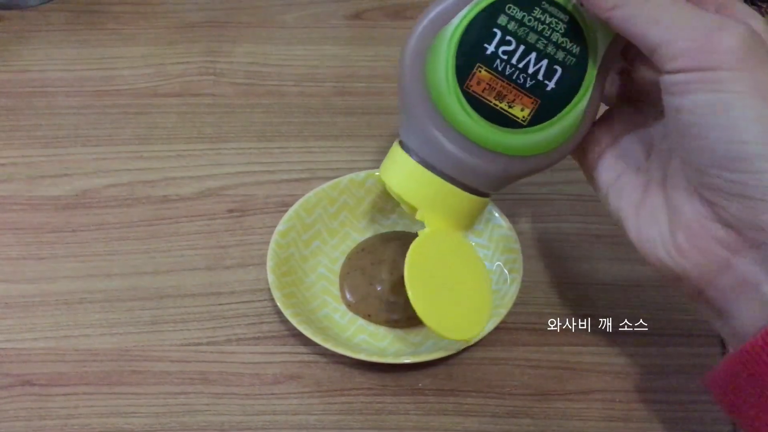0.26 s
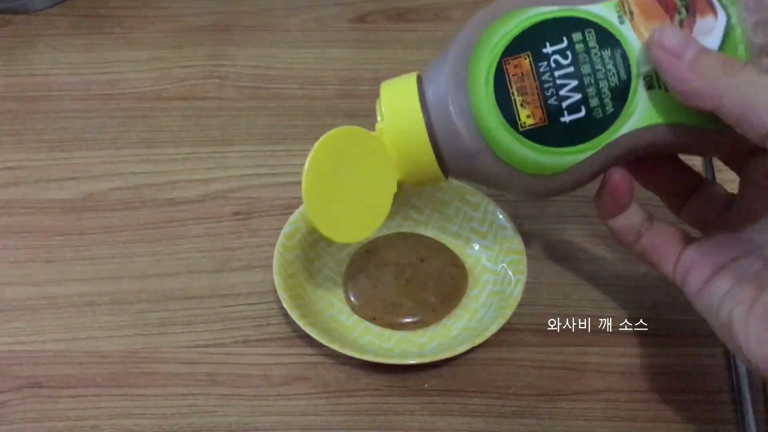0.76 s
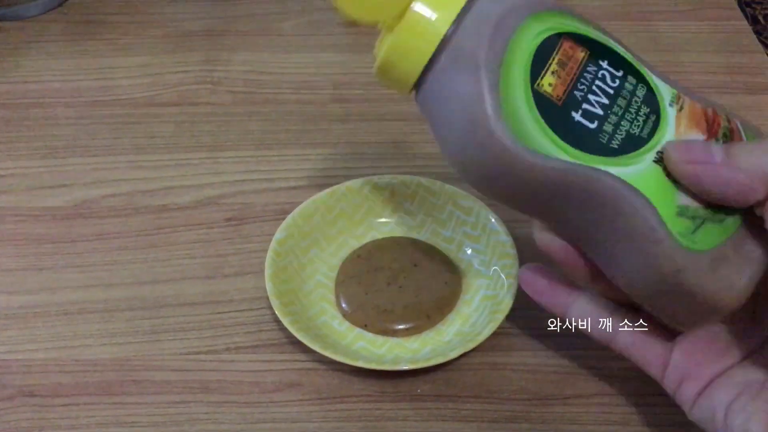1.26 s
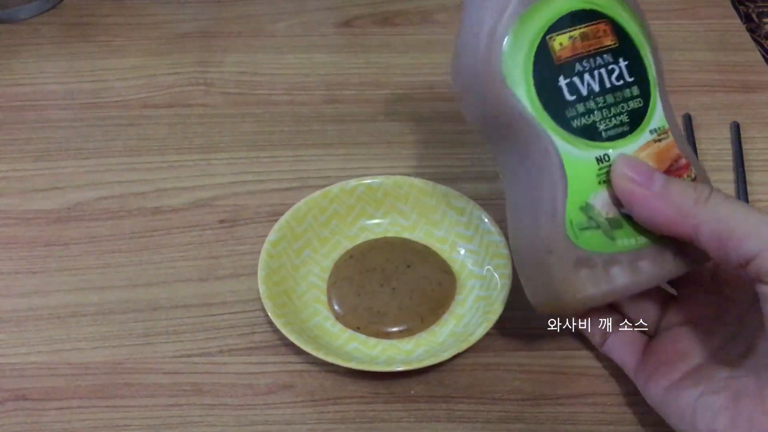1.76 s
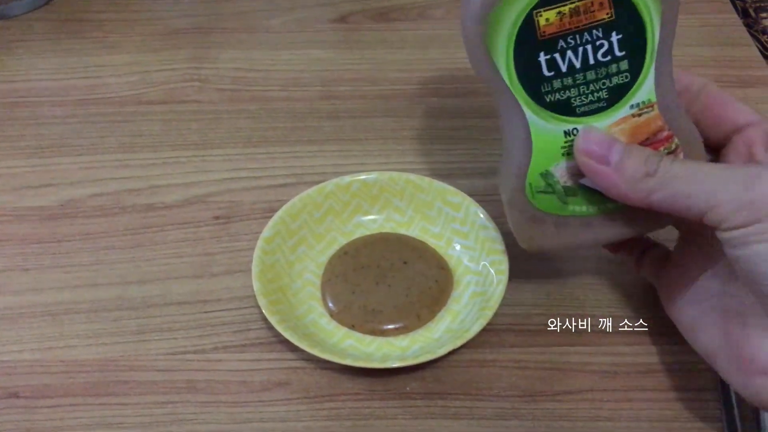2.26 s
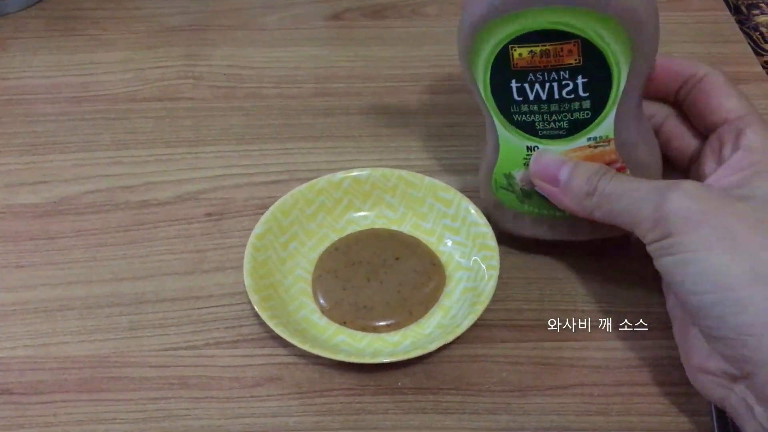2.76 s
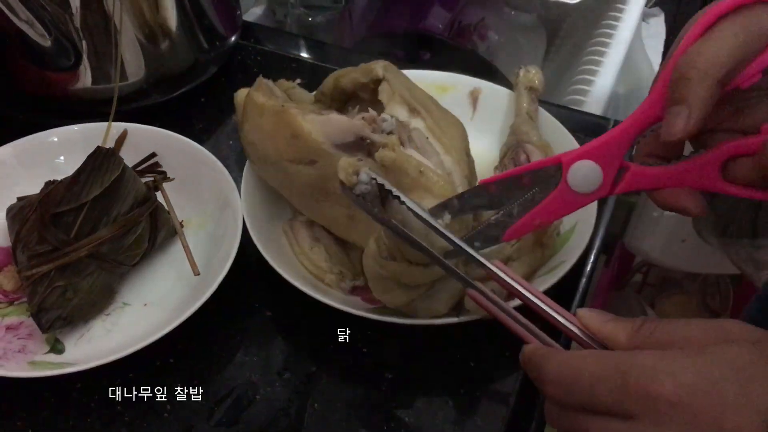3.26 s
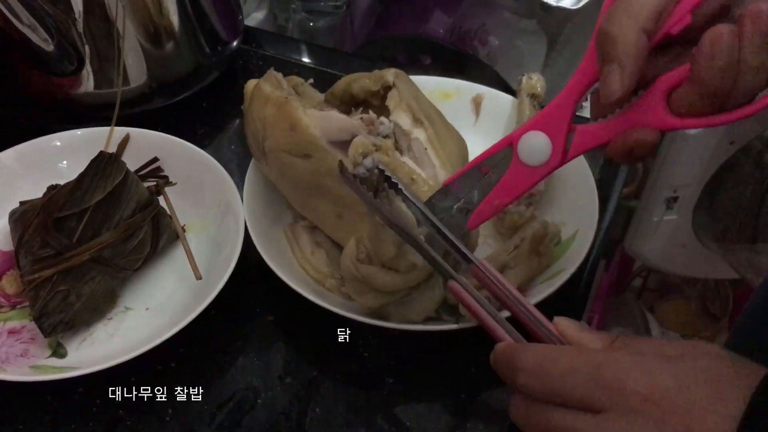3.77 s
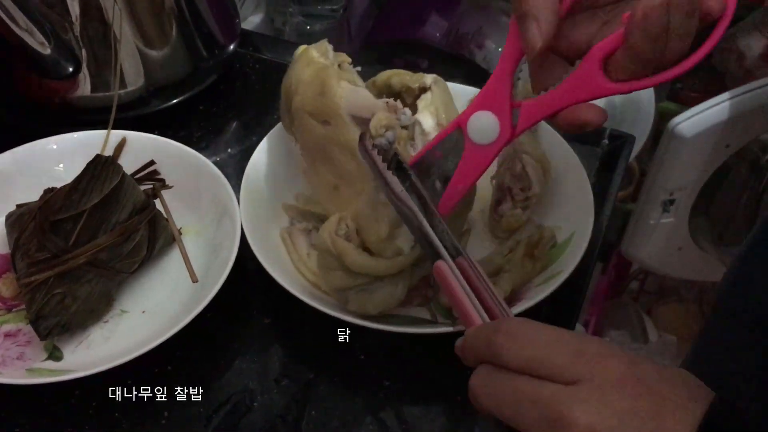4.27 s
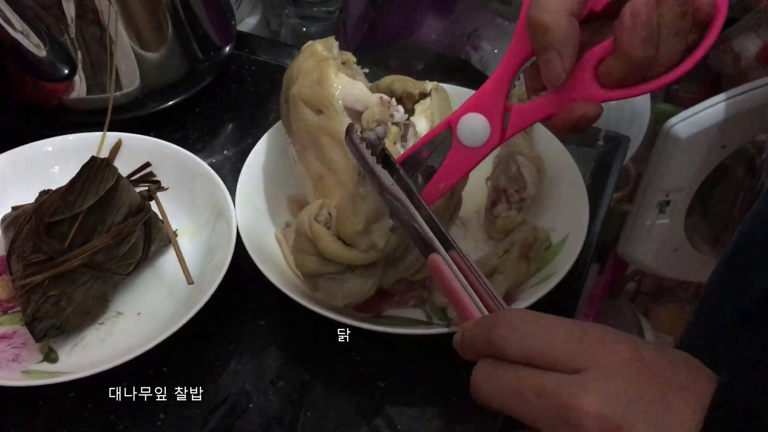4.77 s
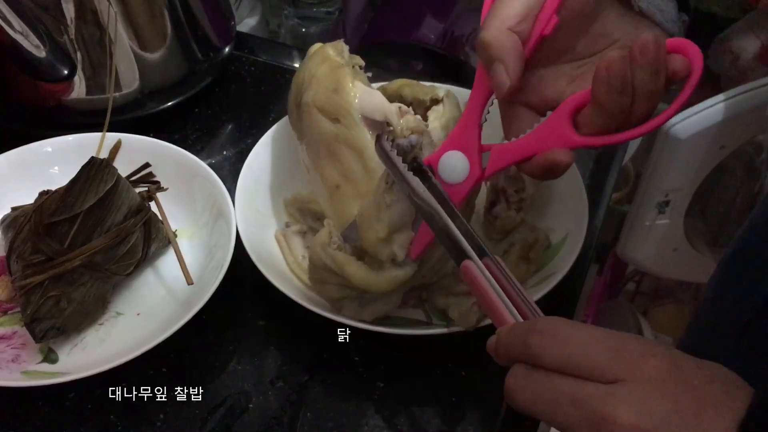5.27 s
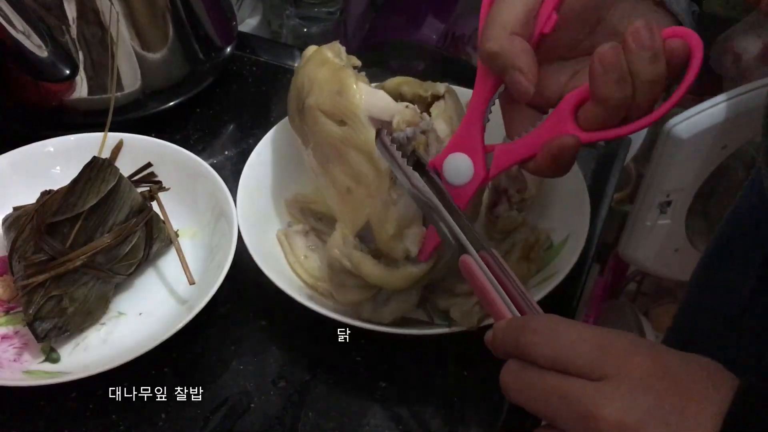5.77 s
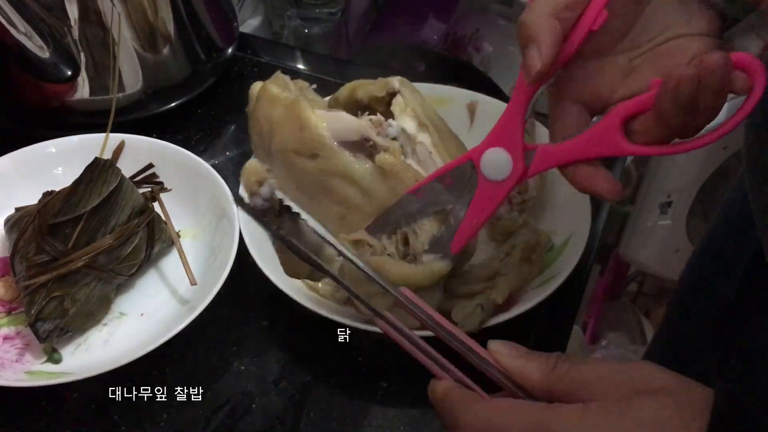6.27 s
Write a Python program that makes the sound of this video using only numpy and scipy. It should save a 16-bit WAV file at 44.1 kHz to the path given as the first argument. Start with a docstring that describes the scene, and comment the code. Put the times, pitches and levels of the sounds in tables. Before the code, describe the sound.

In a hushed room, fingers rub faintly on a plastic sauce bottle whose wall ticks and creaks. It is set down with a soft, quick knock, lightly ringing a dish. Abruptly, a low wavering kitchen drone begins. Close by, scissors tick through wet cooked chicken, steel tongs scrape lightly, one bright snip lands, then another, followed at once by a loud bone crack and small trailing clicks.

```python
"""First, fingers slide and tick on a plastic sauce bottle at a quiet table; set down, it knocks and rings beside a dish.
Then, over a kitchen's low drone, scissors work into a boiled chicken held with steel tongs:
wet ticks, two sharp snips, and a bone that gives way with a crack.
Rubs, hiss and air are filtered noise; cuts and cracks are short coloured bursts; struck things ring as dying sines."""
import sys
import numpy as np
from scipy import signal
from scipy.fft import rfft, irfft
from scipy.io import wavfile
from scipy.ndimage import uniform_filter1d

SR = 44100
rng = np.random.default_rng(int(sys.argv[2]) if len(sys.argv) > 2 else 0)


def log_audio(samples):
    """Write samples as a 16-bit WAV file to the path given in sys.argv[1]."""
    # one column per channel
    frames = np.atleast_2d(samples).T
    # limit to full scale, then quantise
    limited = np.clip(frames, -1, 1)
    pcm = np.round(limited * 32767).astype(np.int16)
    wavfile.write(sys.argv[1], SR, pcm)


N = 287825
FREQS = np.fft.rfftfreq(N, 1 / SR)
TIME = np.arange(N) / SR


def gain_of(db):
    """Turns decibels into a factor."""
    return 10 ** (np.asarray(db) / 20)


def evened(x):
    """Scales a sound to an average strength (rms) of 1."""
    return x / np.sqrt(np.mean(x ** 2) + 1e-20)


def read(points, hz):
    """Joins table points with straight lines on a log-frequency axis."""
    point_hz, value = np.transpose(points)
    return np.interp(np.log(hz + 1), np.log(point_hz + 1), value)


def add(mix, start_s, sound):
    """Mixes a sound in at a given time, cutting off what runs past the end."""
    part = mix[max(round(start_s * SR), 0):][:len(sound)]
    part += sound[:len(part)]


def noise(gain):
    """Noise of rms 1, shaped by a gain at each frequency."""
    spectrum = rfft(rng.standard_normal(N)) * gain
    return evened(irfft(spectrum, N))


def resonant_noise(hz, width_hz):
    """Noise of rms 1 in one narrow resonance."""
    return noise(1 / (1 + (2 * (FREQS - hz) / width_hz) ** 2))


def hump(hz, centre_hz, octaves):
    """A broad resonance in dB, with skirts that fall slowly."""
    distance = np.log2((hz + 1) / centre_hz) / octaves
    return -14 * np.log10(1 + distance ** 4 / 2) - 10 * np.log10(1 + distance ** 2)


def impulse(colour, size=1024):
    """A click that starts at once, with spectrum colour(Hz) in dB; rms 1 over a millisecond."""
    hz = abs(np.fft.fftfreq(size, 1 / SR))
    log_gain = np.log(gain_of(np.maximum(colour(hz), -70)))
    # this choice of phase (minimum phase) puts the energy as early as possible
    click = np.fft.ifft(np.exp(np.conj(signal.hilbert(log_gain)))).real
    return click / np.linalg.norm(click) * np.sqrt(SR / 1000)


def spatter(decay_s, direct, size=1024):
    """One push followed by a dying rush of tiny slips; energy 1."""
    rush = rng.standard_normal(size) * np.exp(-np.arange(size) / SR / decay_s)
    rush /= np.linalg.norm(rush)
    rush[0] = direct
    # many slips together favour no pitch: flatten the spectrum, keep its phase
    spectrum = rfft(rush, 2 * size)
    rush = irfft(spectrum / np.sqrt(abs(spectrum) + 1e-9))[:size]
    return rush / np.linalg.norm(rush)


def ring(modes, size=16384):
    """A struck thing sounds several pitches, each dying by 60 dB in its own t60."""
    t = np.arange(size) / SR
    return sum(gain_of(db - 60 * t / t60) * np.sin(2 * np.pi * hz * t) for hz, db, t60 in modes)


def room(x, size=16384):
    """Dense reflections that build up quickly and die at a rate set for each frequency."""
    # The room's ring: pitch_hz, t60_s
    room_decay = [(200, 0.39), (1500, .25), (5000, 0.12), (9000, 0.12), (16000, 0.12)]
    hz, t, bands = signal.stft(rng.standard_normal(size), SR, nperseg=256)
    fading = gain_of(-60 * t / read(room_decay, hz)[:, None])
    tail = signal.istft(bands * fading, SR, nperseg=256)[1][:size]
    tail *= 1 - np.exp(-(np.arange(size) / SR / 0.001) ** 2)
    return signal.fftconvolve(x, tail / np.linalg.norm(tail))[:N]


def tones(rows):
    """Steady faint sines, each starting at a random phase."""
    return sum(gain_of(db) * np.sqrt(2) * np.sin(2 * np.pi * (hz * TIME + rng.random())) for hz, db in rows)


def scrapes(rows, modes, rasp_db=-4, rasp_hz=7000):
    """A short stroke of friction rasps and feeds the ringing pitches of the rubbed thing."""
    out, ringing = np.zeros(N), ring(modes)
    rasp = impulse(lambda f: hump(f, rasp_hz, 0.87))
    for middle_s, length_s, db in rows:
        count = int(length_s * SR)
        stroke = rng.standard_normal(count) * np.hanning(count)
        for body, body_db in ((ringing, 0), (rasp, rasp_db)):
            sound = signal.fftconvolve(stroke, body)
            # the level is that of the stroke's second half
            sound /= np.std(sound[count // 2:count])
            add(out, middle_s - length_s / 2, gain_of(db + body_db) * sound)
    return out


def table_air(level_db=-46.5):
    """The hush around the dining table: shaped noise and faint steady appliance tones."""
    # Colour of the still air, before it is scaled to its level: pitch_hz, relative_db
    air_colour = [(12, -50), (30, -4), (45, -10), (64, 2.5), (85, -8), (140, -6.5), (200, -13.5),
                  (360, -14), (420, -25), (1100, -28.5), (2100, -35.5), (3300, -46.5), (7000, -49),
                  (15500, -60)]
    # Appliance tones: pitch_hz, level_db
    tone_rows = [(64.6, -54), (673, -74), (1077, -76), (3004, -86)]
    hush = gain_of(level_db) * noise(gain_of(read(air_colour, FREQS)))
    return hush + tones(tone_rows)


def bottle_handling(rub_octaves=1.4, grain_db=2.0, room_db=-6):
    """Skin slides grainily over the plastic, whose wall ticks and creaks under the grip."""
    # Fingers slide on the bottle: middle_s, length_s, level_db, centre_hz
    rub_rows = [(.195, .06, -69.5, 11000), (0.727, 0.32, -76, 7000), (1.002, 0.085, -68, 7400),
                (1.289, 0.048, -64.5, 10000), (1.425, 0.084, -67, 5500), (1.568, 0.059, -68.5, 8950),
                (1.675, 0.16, -67.5, 8900), (1.706, 0.044, -62, 10800)]
    # The bottle's wall ticks: start_s, level_db, centre_hz
    tick_rows = [(.174, -62, 3000), (.429, -51.5, 2000), (1.065, -54.5, 4500), (1.512, -57.5, 5500),
                 (1.945, -59, 4000), (2.114, -54, 4050), (2.147, -58, 5000)]
    # The squeezed bottle creaks: middle_s, length_s, level_db
    creak_rows = [(1.421, .014, -51)]
    # The creaking wall rings with: pitch_hz, relative_db, t60_s
    wall_modes = [(1800, 2.5, 0.035), (2277, -4, .03), (3630, -8, .025)]
    out = scrapes(creak_rows, wall_modes, rasp_db=-6.5, rasp_hz=2800)
    for middle_s, length_s, db, hz in rub_rows:
        count = int(length_s * SR)
        unevenness = evened(uniform_filter1d(rng.standard_normal(count), size=90))
        friction = rng.standard_normal(count) * gain_of(grain_db * unevenness)
        hiss = signal.fftconvolve(friction, impulse(lambda f: hump(f, hz, rub_octaves)))[:count]
        swell = np.sin(np.pi * np.arange(count) / count)
        add(out, middle_s - length_s / 2, gain_of(db) * evened(hiss) * swell)
    for start_s, db, hz in tick_rows:
        click = impulse(lambda f: hump(f, hz, 0.91))
        add(out, start_s, gain_of(db) * np.convolve(click, spatter(0.0018, direct=0.9)))
    return out + gain_of(room_db) * room(out)


def bottle_landing(ring_db=-1, thud_db=3.5, thud_hz=650, low_hz=170, room_db=-7):
    """Soft pushes of the bottle's base knock the table, which gives off little bass; the first rings the dish."""
    # The base lands and rocks: start_s, level_db (ring and thud add their own dB), contact_s
    landing_rows = [(2.5755, -38.5, 0.00039), (2.5846, -38.5, 0.00025), (2.589, -40.5, 0.00055)]
    # Bottle and table ring with: pitch_hz, relative_db, t60_s
    table_modes = [(226, -14, .16), (266, -1.5, 0.22), (306, -4, .1), (352, 0, 0.28), (488, -1, 0.067),
                   (550, -1.5, 0.059), (700, -7.5, 0.059), (939, 6, 0.048), (988, -2, 0.14),
                   (1280, -17, .025), (1673, -2, 0.062), (2540, -18, .025), (3200, -23, .025)]
    # The dish, grazed as the bottle lands: pitch_hz, level_db, t60_s
    dish_modes = [(2275, -52, 0.26), (2305, -60, 0.17), (4613, -61, 0.11), (7386, -65, .11)]
    thuds, rings, body = np.zeros(N), np.zeros(N), ring(table_modes)
    thud = impulse(lambda f: hump(f, thud_hz, 1.12) - 10 * np.log10(1 + (f / 3500) ** 4))
    for start_s, db, contact_s in landing_rows:
        # a longer contact makes a softer push, which excites less treble
        push = np.exp(-np.arange(256) / SR * 2 * np.pi / contact_s)
        add(rings, start_s, gain_of(db + ring_db) * signal.fftconvolve(body, push / push.sum()))
        add(thuds, start_s, gain_of(db + thud_db) * np.convolve(thud, spatter(0.0034, direct=.15)))
    add(rings, landing_rows[0][0], ring(dish_modes))
    knocks = rings + thuds + gain_of(room_db) * room(thuds)
    return signal.sosfilt(signal.butter(2, low_hz, "highpass", fs=SR, output="sos"), knocks)


def droning(hz, width_hz, level, steadiness):
    """A resonance that wanders in pitch, its strength held close to a level curve."""
    band = resonant_noise(hz, width_hz)
    # dividing by most of its own swell makes the band steadier
    band = evened(band / abs(signal.hilbert(band)) ** min(steadiness, 1))
    return band * gain_of(np.interp(TIME, *np.transpose(level)))


def kitchen_air(wash_db=-42, hum_db=0.0, boom_db=-1.0, rumble_db=-8, rumble_hz=52, steadiness=0.84):
    """Fan-like wash and a drone whose hum and boom beat against each other over a rumble."""
    # Colour of the still air, before it is scaled to its level: pitch_hz, relative_db
    air_colour = [(12, -43), (28, -10), (45, -3), (80, -5.5), (140, -5), (200, -13.5), (340, -11),
                  (430, -16.5), (1000, -20), (2000, -27), (3200, -35.5), (6000, -41), (9000, -47.5),
                  (15500, -65)]
    # The hum swells and sinks: time_s, level_db
    hum_level = [(2.87, -35), (3.17, -47.5), (3.35, -33.5), (3.42, -43), (3.9, -33.5), (4.14, -49.5),
                 (4.23, -32), (4.28, -50), (4.37, -35.5), (4.81, -35), (4.87, -45), (5.18, -32.5),
                 (5.51, -53.5), (5.72, -34.5), (6.03, -42.5), (6.52, -36.5)]
    # So do the boom and the rumble under it: time_s, level_db (each adds its own dB)
    boom_level = [(2.87, -46.5), (3.8, -41), (3.85, -33.5), (4.01, -47), (4.1, -34.5), (4.59, -38),
                  (4.65, -30.5), (4.97, -41), (5.5, -45), (5.73, -33), (6.08, -48.5), (6.52, -41)]
    # The drone's steady upper resonances: pitch_hz, width_hz, level_db
    upper_rows = [(265.5, 10.5, -57.5), (331.6, 10.4, -58), (665, 19, -59.5)]
    # Faint steady appliance tones: pitch_hz, level_db
    tone_rows = [(1077, -66.5), (1324, -69.5), (1459, -76), (2530, -77.5)]
    wash = gain_of(wash_db) * noise(gain_of(read(air_colour, FREQS)))
    hum = gain_of(hum_db) * droning(118.6, 4.5, hum_level, steadiness)
    boom = gain_of(boom_db) * droning(103.94, 7.8, boom_level, steadiness)
    rumble_level = rumble_db + np.interp(TIME, *np.transpose(boom_level))
    rumble = noise(gain_of(hump(FREQS, rumble_hz, 0.39))) * gain_of(rumble_level)
    upper = sum(gain_of(db) * resonant_noise(hz, width_hz) for hz, width_hz, db in upper_rows)
    return wash + hum + boom + rumble + upper + tones(tone_rows)


def grainy_hiss(centre_hz=9000, grains_per_s=2500, spread_db=-2.0, release_s=0.054, faint_db=-74.5):
    """A faint hiss, made of random tiny grains, that jumps up at a cut, holds, and dies back."""
    # The hiss jumps up: start_s, hold_s, level_db
    surge_rows = [(4.21, 0.36, -66.5), (5.04, 0.036, -67), (5.96, 0.36, -65)]
    sizes = gain_of(spread_db * np.minimum(rng.exponential(1, N), 5)) * rng.choice([-1, 1], N)
    grains = sizes * (rng.random(N) < grains_per_s / SR)
    hiss = evened(irfft(rfft(grains) * gain_of(hump(FREQS, centre_hz, .9)), N))
    surges = np.zeros(N)
    for start_s, hold_s, db in surge_rows:
        dying = np.exp(-np.maximum(TIME - start_s - hold_s, 0) / release_s)
        surges += gain_of(db) * (TIME > start_s) * dying
    # between cuts a fainter hiss remains
    return hiss * np.maximum(surges, gain_of(faint_db))


def wet_ticks(ticks_per_s=10, level_db=-57, spread_db=1, centre_hz=10400, octaves=.6):
    """Faint ticks, one at a random moment in each slot of the cutting spells, as rows like those of the snips."""
    # The scissors work through soft flesh: start_s, end_s (equal times give no ticks)
    working_spells = [(3.0, 3), (3.5, 3.8), (5.0, 5.15), (5.75, 6.8)]
    rows = []
    for start_s, end_s in working_spells:
        slots = np.arange(start_s, end_s, 1 / ticks_per_s)
        for slot_s, (late, size, pitch) in zip(slots, rng.uniform(-1, 1, (len(slots), 3))):
            tick_s = slot_s + abs(late) / ticks_per_s
            rows.append((tick_s, level_db + spread_db * size, centre_hz * 2 ** (.3 * pitch), octaves))
    return rows


def cutting_clicks(room_db=-8):
    """The small clicks and ticks of the cutting, each a short burst with its own pitch and width."""
    # Small clicks of the cutting, with the low body of the first snap and the blade's bites
    # before the bone cracks: start_s, level_db, centre_hz, width_octaves
    click_rows = [(3.498, -48.5, 7250, .23), (3.538, -45, 9000, 1.5), (3.642, -45, 8340, 0.68),
                  (3.819, -52, 8000, .44), (3.833, -53, 7400, .44), (4.004, -46, 10000, 0.97),
                  (4.025, -42, 9300, 1.2), (4.181, -47, 8500, .3), (4.209, -38, 8350, .42),
                  (4.2123, -34, 1980, 1.4), (5.042, -50, 11000, .5), (5.048, -42, 7500, .85),
                  (5.054, -39.5, 5800, 0.22), (5.07, -50, 7000, 0.83), (5.214, -55, 9500, .46),
                  (5.458, -47, 10700, .46), (5.801, -43.5, 7000, 1), (5.845, -34.5, 6870, .7),
                  (5.952, -27, 6900, 1.1), (5.958, -31, 5500, 0.91), (6.186, -49, 6200, .33),
                  (6.239, -44.5, 7300, .17), (6.293, -46, 9800, .73)]
    out = np.zeros(N)
    for start_s, db, hz, octaves in [*click_rows, *wet_ticks()]:
        click = impulse(lambda f: hump(f, hz, octaves))
        add(out, start_s, gain_of(db) * np.convolve(click, spatter(0.0013, direct=0.58)))
    return out + gain_of(room_db) * room(out)


def squeak(start_s=3.4, length_s=.1, start_hz=13400, rise_hz_per_s=4000, level_db=-73, waver=.006):
    """Wet skin squeaks thinly along a blade: one unsteady rising glide that swells and fades."""
    t = np.arange(0, length_s, 1 / SR)
    unsteadiness = evened(uniform_filter1d(rng.standard_normal(len(t)), size=60))
    pitch_hz = (start_hz + rise_hz_per_s * t) * (1 + waver * unsteadiness)
    glide = np.sin(2 * np.pi * np.cumsum(pitch_hz) / SR)
    out = np.zeros(N)
    add(out, start_s, gain_of(level_db) * np.sin(np.pi * t / length_s) * glide)
    return out


def tong_scrapes():
    """The steel tongs are grazed and sing briefly: friction noise feeds their ringing pitches."""
    # Strokes: middle_s, length_s, level_db
    tong_rows = [(3.882, .012, -61), (3.905, 0.012, -63), (3.952, 0.043, -59.5), (4.025, 0.033, -60),
                 (4.11, 0.06, -66), (4.685, 0.068, -67)]
    # The tongs ring with: pitch_hz, relative_db, t60_s
    tong_modes = [(3480, -1, 0.069), (4538, -2, .05), (5690, 1, 0.046), (6940, -8, .05), (9981, -7, .08),
                  (11500, -16, .04), (13450, -14, .03)]
    return scrapes(tong_rows, tong_modes)


def blade_snaps(room_db=-6):
    """The blades jump through gristle and meet: a broad, dry snap with a short tail of room."""
    # The blades shut: start_s, level_db, brightness_db_per_octave (above 4000 Hz)
    snap_rows = [(4.2126, -19, 9), (5.8443, -28.5, -11)]
    # Colour of the snap before that brightness: pitch_hz, relative_db
    steel_colour = [(300, -18), (1200, -19), (2500, -15.5), (4000, -15.5), (5200, -6), (6400, 4.5),
                    (7500, 8.5), (9500, -8), (11000, -3), (16000, -8.5)]
    out = np.zeros(N)
    for start_s, db, tilt in snap_rows:
        click = impulse(lambda f: read(steel_colour, f) + tilt * np.log2(np.maximum(f, 4000) / 4000))
        add(out, start_s, gain_of(db) * np.convolve(click, spatter(0.00058, direct=3.8)))
    return out + gain_of(room_db) * room(out)


def blade_scrapes():
    """Steel grazes steel as the blades rub: friction noise feeds their ringing pitches."""
    # Strokes: middle_s, length_s, level_db
    blade_rows = [(5.284, 0.013, -61), (5.304, 0.013, -55.5)]
    # The blades ring with: pitch_hz, relative_db, t60_s
    blade_modes = [(4021, 0, .08), (6002, 6, .05), (8350, -7, 0.036), (11160, 0, .04), (13700, -11, .03),
                   (15500, -7, .06)]
    return scrapes(blade_rows, blade_modes)


def bone_crack(ring_db=-33.5, room_db=-4.0):
    """The bone breaks in stages; the biggest jolt rings scissors and plate."""
    # The bone splinters in a quick run of fractures: start_s, level_db, decay_s
    fracture_rows = [(5.9608, -18.5, 0.00082), (5.963, -19, 0.00051), (5.9638, -14, 0.00061),
                     (5.9659, -20, 0.00072), (5.9704, -27.5, .0008), (5.979, -45, 0.0009),
                     (5.9823, -26.5, 0.0018)]
    # Colour of a fracture: pitch_hz, relative_db
    bone_colour = [(150, -27), (510, 0), (750, -8), (1400, -9.5), (1950, -12), (2550, -8), (3050, 0),
                   (4400, -3.5), (5200, -3), (5900, 1), (7500, -6), (9500, -7.5), (11000, -13),
                   (16000, -22.5)]
    # Scissors and plate ring with: pitch_hz, relative_db, t60_s
    scissor_modes = [(520, 2, .14), (930, -7, .14), (1400, -7, .14), (1650, -7, .16), (2636, -5, .09),
                     (2760, -1, .11), (2928, -1, .08), (3083, 2, .12), (3167, -1, .1), (3596, -2, .11),
                     (3760, 1, .12), (3880, 0, .11), (4710, -1, .1), (5459, -1, .1), (5735, -1, .12),
                     (5885, 0, .12), (6660, -4, .12)]
    out, click = np.zeros(N), impulse(lambda f: read(bone_colour, f))
    for start_s, db, decay_s in fracture_rows:
        add(out, start_s, gain_of(db) * np.convolve(click, spatter(decay_s, direct=0.35)))
    out += gain_of(room_db) * room(out)
    biggest = max(fracture_rows, key=lambda row: row[1])
    add(out, biggest[0], gain_of(ring_db) * ring(scissor_modes))
    return out


def scene(kitchen_from_s=2.863):
    """The table, then at once the kitchen."""
    table = table_air() + bottle_handling() + bottle_landing()
    cutting = cutting_clicks() + squeak() + blade_snaps() + bone_crack()
    steel = tong_scrapes() + blade_scrapes()
    kitchen = kitchen_air() + grainy_hiss() + cutting + steel
    # a crossfade of 128 samples avoids a click
    in_kitchen = uniform_filter1d(1. * (TIME > kitchen_from_s), size=128)
    return (table * (1 - in_kitchen) + kitchen * in_kitchen)[None]


def record(dry, edge_hz=15850):
    """The microphone's housing dips the treble in places, then a steep filter removes the top."""
    # Dips: centre_hz, width_hz, depth_db
    mic_dips = [(4900, 440, -3), (7700, 510, -3), (10480, 590, -4.5)]
    dips_db = sum(db * np.exp(-((FREQS - hz) / width_hz) ** 2) for hz, width_hz, db in mic_dips)
    coloured = irfft(rfft(dry) * gain_of(dips_db), N)
    lowpass = signal.firwin(511, edge_hz, window=("kaiser", 9), fs=SR)
    return signal.oaconvolve(coloured, lowpass[None], "same")


dry = scene()
out = record(dry)
log_audio(out)
```